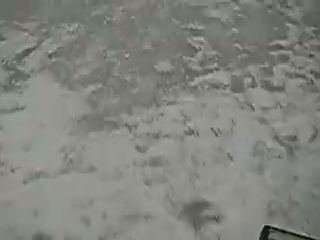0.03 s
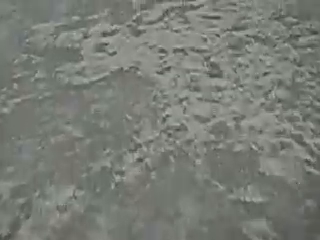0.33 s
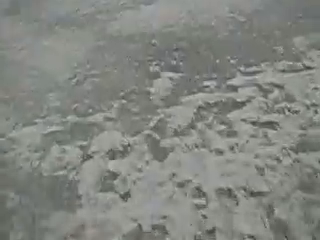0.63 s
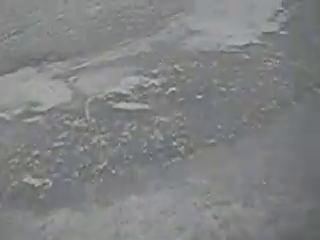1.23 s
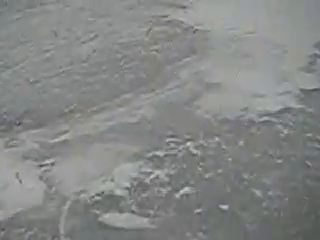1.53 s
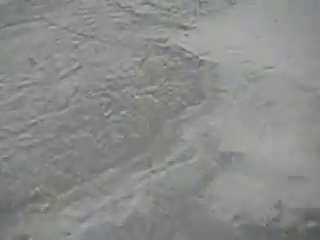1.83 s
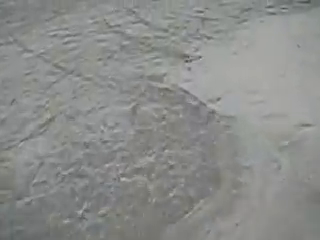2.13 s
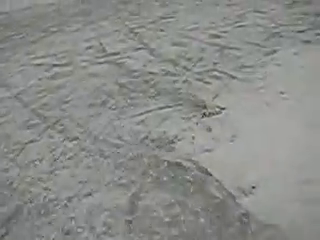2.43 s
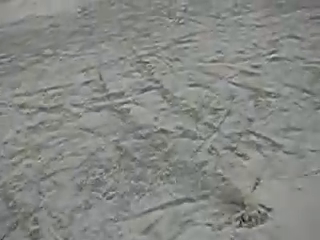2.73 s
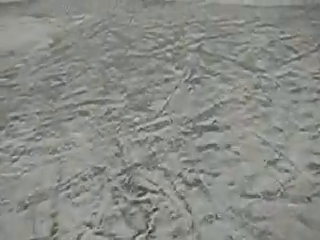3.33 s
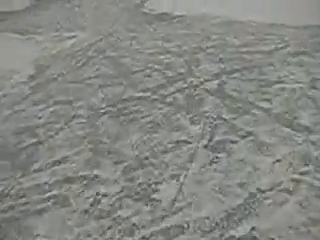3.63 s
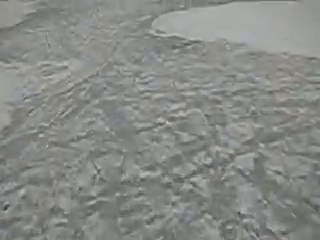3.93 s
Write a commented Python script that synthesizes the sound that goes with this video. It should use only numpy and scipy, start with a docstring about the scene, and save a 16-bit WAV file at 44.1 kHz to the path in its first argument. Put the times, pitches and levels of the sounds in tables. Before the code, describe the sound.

Dense crackling of bike tyres rolling on frozen ground, brittle crust snapping up close.

```python
"""Studded bicycle tyres on frozen ground, heard close up from a small camera on the bike.
From the start the studs bite in a dense crackle, air brushes the microphone, and brittle crust
snaps under the tread in a thick run of pops. About a second in, the rumble of tyres and frame comes up;
it is strongest between two and three seconds. More rough patches crumble by, and the snaps thin out
in the last half second. The narrow-band recorder clips the sharpest of them."""
import sys
import numpy as np
from scipy import signal
from scipy.fft import rfft, irfft
from scipy.io import wavfile
from scipy.ndimage import uniform_filter1d

SR = 44100
rng = np.random.default_rng(int(sys.argv[2]) if len(sys.argv) > 2 else 0)


def unload_wav(signal):
    """Save mono or channel-first audio to the path in sys.argv[1] as 16-bit WAV at rate SR, clipped to [-1, 1]."""
    wavfile.write(
        sys.argv[1],
        SR,
        np.round(np.clip(np.atleast_2d(signal).T, -1, 1) * 32767).astype(np.int16),
    )


N = 176400
BAND_HZ = 3980  # upper edge of the recorder's band


def undb(db):
    """Decibels to gain."""
    return 10 ** (np.asarray(db) / 20)


def unit(x):
    """Scale to rms 1."""
    return x / np.sqrt(np.mean(x ** 2))


def curve(table, column=1):
    """One column of a table, joined by straight lines in time."""
    rows = np.array(table)
    return np.interp(np.arange(N) / SR, rows[:, 0], rows[:, column])


def colour(x, points):
    """Filter by an outline of f/Hz, level/dB."""
    hz, db = np.array(points).T
    f = np.maximum(np.fft.rfftfreq(N, 1 / SR), 1)
    return irfft(rfft(x) * undb(np.interp(np.log(f), np.log(hz), db)), N)


def lowpass(x, hz, size=401):
    """Low-pass without delay, steeper with greater size."""
    return signal.fftconvolve(x, signal.firwin(size, hz, window="blackmanharris", fs=SR), "same")


def drift(rate_hz):
    """Smooth random drift with rms 1."""
    hold = max(int(SR / rate_hz), 2)
    steps = np.repeat(rng.standard_normal(N // hold + 1), hold)
    return unit(uniform_filter1d(steps, hold)[:N])


def add(out, start_s, sound):
    """Mix a sound in at a time."""
    i = int(round(start_s * SR))
    a, b = max(i, 0), min(i + len(sound), len(out))
    if b > a:
        out[a:b] += sound[a - i:b - i]


# Spectrum of the air right at the microphone: f/Hz, relative level/dB
BUFFET_COLOUR = [(5, 2), (25, 0), (55, -2), (90, -5.5), (150, -12), (400, -38.5)]


def air_buffet():
    """Moving air pushes softly on the microphone."""
    return unit(colour(rng.standard_normal(N), BUFFET_COLOUR)) * undb(-44.5)


# Rumble of the bike under the camera: t/s, relative level/dB
RUMBLE_LEVEL = [(0, -49), (.4, -51.5), (.9, -40.5), (1.45, -41.5), (1.7, -35.5), (1.95, -42), (2.3, -34),
                (2.9, -34), (3.6, -37.5), (4, -39)]
# Its spectrum: f/Hz, relative level/dB
RUMBLE_SPECTRUM = [(30, -18), (70, -6.5), (100, -0.5), (140, 0.5), (185, -1), (260, -4.5), (400, -17),
                   (800, -31.5)]


def frame_rumble():
    """The uneven ice shakes the tyres and the frame that carries the camera."""
    shaking = unit(colour(rng.standard_normal(N), RUMBLE_SPECTRUM))
    return shaking * undb(curve(RUMBLE_LEVEL) - 2)


# Steady rolling, close to the microphone: t/s, relative crunch level/dB, relative crackle level/dB
ROLLING_LEVEL = [(0, -31, -36), (.25, -27.5, -36), (.55, -28, -37), (.9, -29, -37), (1.15, -31.5, -37.5),
                 (1.4, -29.5, -36.5), (1.85, -29.5, -35.5), (2.15, -31, -37.5), (2.35, -30.5, -35),
                 (2.6, -30, -36), (2.92, -31, -42), (3.15, -29, -35), (3.5, -30.5, -36), (3.7, -31.5, -36),
                 (4, -32.5, -35.5)]
# Spectrum of the studs on ice: f/Hz, relative level/dB
STUD_SPECTRUM = [(100, -16.5), (220, -4.5), (320, 4), (400, 2.5), (480, 0.5), (650, 0.5), (1000, -2),
                 (1500, 0.5), (1900, -5), (2250, -2), (2600, -8), (3250, -7.5), (3450, -13.5), (3850, -12)]


def studs(patch_gain, bites_per_s=3400, spread_db=1.5, flicker_db=3, split_hz=1420):
    """Thousands of tiny bites a second, in quick flurries as the tread grips, surging on the patches."""
    strikes = rng.random(N) < bites_per_s / SR
    strength = undb(spread_db * np.minimum(rng.exponential(size=N), 4))
    polarity = np.where(rng.random(N) < .7, -1, 1)
    grip = undb(flicker_db * drift(rate_hz=219.6))
    bites = strikes * strength * polarity * grip
    bites = lowpass(colour(bites - bites.mean(), STUD_SPECTRUM), BAND_HZ)
    crunch = lowpass(bites, split_hz, size=101)
    crackle = bites - crunch
    # rolling and patches add in power
    crunch_gain = np.hypot(undb(curve(ROLLING_LEVEL) - 4), patch_gain)
    crackle_gain = np.hypot(undb(curve(ROLLING_LEVEL, column=2) + 2), patch_gain)
    return unit(crunch) * crunch_gain + unit(crackle) * crackle_gain


def fracture(hz, ring_cycles=.45, crack_hz=2500, crack_s=.0002):
    """A flake of ice lets go: a quick swell, a crack, a dying swing. Returns sound and time of peak."""
    lead_s = 3 * ring_cycles / hz
    t = np.arange(SR // 60) / SR - lead_s
    halving_s = ring_cycles / hz * np.where(t < 0, .85, 1)  # rises faster than it dies
    swing = .5 ** ((np.abs(t) / halving_s) ** 1.5) * np.cos(2 * np.pi * hz * t)
    crack = np.exp(-(t / crack_s) ** 2) * np.cos(2 * np.pi * crack_hz * t)
    return -.76 * swing - .24 * crack, lead_s


def chips(per_s=110, centre_hz=1640, octaves=1.1, spread_db=2):
    """Small flakes break at random, louder where the tread crunches harder."""
    out = np.zeros(N)
    for at, size, pitch in rng.random((int(per_s * N / SR), 3)):
        chip, _ = fracture(centre_hz * 2 ** (octaves * (2 * pitch - 1)))
        add(out, at * N / SR, chip * undb(spread_db * min(-np.log(size), 2.5)))
    return out * undb(curve(ROLLING_LEVEL) + 6.5)


# Patches of crust passing under the bike: t/s, length/s, relative level/dB, crumb f/Hz
CRUST_PATCHES = [(0, 0.013, -25.5, 2100), (0.037, 0.0088, -20, 1100), (.052, .008, -21, 1750),
                 (0.103, 0.018, -24.5, 1300), (0.137, .022, -23, 880), (0.282, 0.042, -28.5, 1004),
                 (0.34, 0.063, -29.5, 790), (0.407, 0.013, -21, 1200), (0.436, 0.034, -26, 980),
                 (0.513, 0.02, -28.5, 910), (0.578, 0.03, -30, 1780), (.66, 0.054, -28, 1700),
                 (0.724, 0.037, -27, 1400), (0.826, 0.027, -32, 870), (.92, 0.013, -22.5, 2220),
                 (1.019, 0.044, -30, 1170), (1.3, 0.05, -23.5, 1410), (1.351, 0.042, -30.5, 1600),
                 (1.429, .02, -40, 1900), (1.58, 0.022, -30.5, 900), (1.607, 0.028, -26.5, 1200),
                 (1.651, 0.021, -34, 1400), (1.716, 0.024, -28.5, 1670), (1.774, 0.023, -25.5, 1900),
                 (2.063, 0.025, -31, 1720), (2.375, 0.022, -20.5, 1014), (2.43, .045, -27, 1300),
                 (2.488, .035, -23, 1860), (2.66, 0.028, -30.5, 1210), (2.764, 0.034, -28.5, 1820),
                 (2.861, 0.0086, -23.5, 1530), (2.992, 0.053, -26, 1230), (3.071, 0.033, -24, 1400),
                 (3.207, 0.017, -20.5, 1310), (3.241, 0.036, -34.5, 1540), (3.357, 0.016, -31, 1230),
                 (3.401, 0.041, -30.5, 1660)]


def patch_bite(edge_s=.0027):
    """Extra gain of the studs, which bite harder while the tread crosses a patch."""
    t, gain = np.arange(N) / SR, np.zeros(N)
    for at, length, db, _ in CRUST_PATCHES:
        enter = np.clip((t - at) / edge_s + .5, 0, 1)
        leave = np.clip((at + length - t) / edge_s + .5, 0, 1)
        gain += undb(db - 5) * enter * leave
    return gain


def crumbs(per_s=550, spread_db=13, octaves=.78):
    """Each patch of crust collapses in a swarm of small fractures."""
    out = np.zeros(N)
    for at, length, db, hz in CRUST_PATCHES:
        draws = rng.random((100, 3))
        count = int(np.clip(length * per_s, 2, len(draws)))
        swarm = np.zeros(int(length * SR) + SR // 100)
        for k, (late, size, pitch) in enumerate(draws[:count]):
            crumb, _ = fracture(hz * 2 ** (octaves * (2 * pitch - 1)))
            add(swarm, (k + late) / count * length, crumb * undb(spread_db * size))
        patch_rms = np.linalg.norm(swarm) / np.sqrt(length * SR)
        add(out, at, swarm / patch_rms * undb(db - 4.5))
    return out


# Loud snaps in the foreground, big flakes sounding low: t/s, peak level/dB, f/Hz, ring/cycles
CRUST_SNAPS = [(0.0565, -0.4, 1070, 1.1), (0.0811, -6.0, 1010, 0.5), (0.0912, -6.1, 960, 0.5),
               (0.105, -9.5, 2290, 1.5), (0.1077, -12.6, 2170, 1.5), (0.1149, -4.3, 960, 0.4),
               (0.1204, -5.1, 910, 0.5), (0.1372, -8.6, 1130, 1.1), (0.1505, -4.5, 820, 0.4),
               (0.1536, -5.7, 770, 0.5), (0.2134, -7.1, 1070, 0.4), (0.2876, -4.9, 770, 0.65),
               (0.2926, -4.6, 690, 0.5), (0.2959, -15.8, 590, 1.5), (0.3108, -4.5, 860, 0.5),
               (0.4008, -6.3, 1190, 0.65), (0.4093, -11.1, 910, 1.5), (0.4328, -10.1, 1070, 0.5),
               (0.4411, -8.3, 910, 0.5), (0.4465, -4.7, 1260, 1.1), (0.4534, -1.8, 1010, 0.5),
               (0.4626, -6.0, 1070, 0.8), (0.4701, -6.8, 1010, 0.5), (0.4737, -8.4, 770, 0.5),
               (0.5227, -6.1, 690, 0.5), (0.5257, -8.8, 1070, 0.5), (0.5573, -12.4, 1330, 0.3),
               (0.5647, -6.8, 1480, 0.4), (0.5866, -10.6, 2050, 0.8), (0.5905, -4.3, 2170, 1.1),
               (0.5993, -9.7, 2290, 1.5), (0.6071, -11.4, 2170, 1.1), (0.6719, -8.6, 770, 0.4),
               (0.6804, -12.4, 1190, 0.4), (0.6962, -18.7, 620, 1.5), (0.7328, -11.2, 1190, 0.5),
               (0.7466, -2.3, 1130, 0.5), (0.7499, -4.2, 1650, 0.3), (0.7575, -12.5, 1400, 0.5),
               (0.8158, -13.2, 1260, 0.5), (0.8799, -12.5, 1260, 1.1), (0.8945, -11.9, 860, 0.4),
               (0.9229, -1.2, 1330, 0.65), (0.926, -6.1, 2170, 0.3), (0.9285, -9.3, 960, 0.4),
               (1.0237, -14.2, 770, 0.4), (1.038, -2.1, 1940, 0.4), (1.2005, -12.9, 1480, 0.4),
               (1.2104, -12.6, 1130, 0.3), (1.2231, -6.6, 1570, 0.4), (1.3046, -4.4, 1070, 0.5),
               (1.3093, -8.3, 1260, 1.5), (1.3163, -11.6, 1330, 1.5), (1.3193, -1.2, 960, 0.4),
               (1.3265, -9.5, 1650, 0.8), (1.331, -9.3, 1130, 0.8), (1.3448, -8.5, 1650, 0.5),
               (1.354, -14.1, 590, 0.5), (1.362, -10.1, 1130, 0.4), (1.3673, -16.4, 1480, 1.5),
               (1.4323, -11.1, 1840, 0.65), (1.438, -12.0, 1840, 0.5), (1.4426, -11.1, 1260, 0.8),
               (1.4465, -6.9, 1840, 0.5), (1.4745, -15.4, 1480, 0.8), (1.5053, -10.4, 1480, 0.4),
               (1.5404, -17.0, 1480, 1.5), (1.5721, -11.6, 1570, 0.3), (1.5773, -10.4, 1480, 0.5),
               (1.5913, -10.0, 500, 0.4), (1.6244, -9.9, 960, 0.3), (1.6531, -10.6, 1400, 0.3),
               (1.6597, -15.0, 1400, 1.1), (1.7022, -12.4, 1480, 0.3), (1.7211, -9.3, 1570, 0.65),
               (1.7315, -5.3, 1330, 0.4), (1.7776, -12.7, 820, 0.3), (1.7857, -1.1, 1330, 0.8),
               (1.8013, -5.6, 1480, 0.5), (1.8394, -13.4, 1330, 0.5), (1.8849, -14.0, 1570, 0.65),
               (1.9567, -10.5, 1740, 0.5), (1.9696, -7.3, 1570, 0.3), (2.0348, -12.4, 1260, 1.1),
               (2.0649, -12.2, 1130, 0.3), (2.0732, -7.2, 1570, 0.5), (2.1088, -10.4, 2170, 0.3),
               (2.1255, -11.1, 1330, 0.65), (2.1515, -16.4, 1570, 0.8), (2.1556, -13.2, 1650, 0.3),
               (2.2209, -12.8, 1840, 0.5), (2.2278, -11.1, 1400, 0.4), (2.2671, -6.7, 1740, 0.65),
               (2.2869, -12.3, 1260, 0.4), (2.2963, -8.6, 1330, 0.5), (2.3044, -15.0, 1400, 0.8),
               (2.3328, -15.6, 1480, 0.8), (2.3827, -6.7, 2050, 1.5), (2.3874, -1.1, 1010, 0.65),
               (2.4279, -10.5, 3000, 0.65), (2.4358, -7.6, 2170, 0.4), (2.5166, -5.3, 2050, 0.65),
               (2.5198, 0.5, 1740, 0.5), (2.5356, -12.0, 1740, 0.5), (2.564, -11.0, 1740, 0.65),
               (2.6098, -6.3, 1940, 0.3), (2.6652, -11.1, 1190, 0.4), (2.6686, -6.3, 1190, 0.4),
               (2.6751, -14.5, 1190, 0.65), (2.7305, -16.1, 1570, 1.5), (2.7762, -8.8, 2050, 1.1),
               (2.797, -8.3, 1650, 0.65), (2.8629, -6.0, 1400, 0.65), (2.9621, -13.0, 1400, 0.4),
               (2.9923, -5.6, 1130, 0.4), (3.0257, -0.6, 1260, 0.65), (3.0288, -14.9, 1330, 1.5),
               (3.0917, -4.6, 2290, 0.8), (3.1564, -11.4, 1740, 0.3), (3.1885, -11.9, 2420, 1.5),
               (3.1923, -5.8, 1330, 0.5), (3.2101, -6.9, 2170, 0.8), (3.2159, -9.4, 500, 0.4),
               (3.2191, -6.2, 1330, 0.3), (3.2251, -7.6, 1260, 0.8), (3.2393, -9.5, 1330, 0.65),
               (3.2617, -13.8, 2050, 1.1), (3.2832, -16.2, 1570, 1.1), (3.3057, -14.1, 1480, 0.8),
               (3.3299, -10.9, 1740, 0.3), (3.4092, -0.2, 1400, 0.65), (3.4125, -9.9, 1190, 0.4),
               (3.4369, -7.4, 1330, 0.3), (3.5584, -6.5, 1070, 0.3), (3.5994, -14.2, 1260, 0.65),
               (3.686, -12.8, 1570, 0.65), (3.7039, -14.4, 1480, 0.5), (3.7698, -12.5, 1400, 0.3),
               (3.9551, -9.1, 3000, 0.3), (3.9753, -9.6, 2170, 0.3), (3.9885, -14.2, 1570, 0.4)]


def snaps(thump_hz=315, thump_db=-22.5, splinter_db=-25, splinter_s=.0021):
    """Crust breaks under the tread; the tyre thumps and splinters scatter just after."""
    out, t = np.zeros(N), np.arange(SR // 25) / SR
    thump = np.sin(2 * np.pi * thump_hz * t) * np.exp(-t * thump_hz)
    for at, db, hz, ring_cycles in CRUST_SNAPS:
        snap, lead_s = fracture(hz, ring_cycles)
        hiss = unit(lowpass(rng.standard_normal(len(t)), min(2 * hz, BAND_HZ), size=41))
        splinters = hiss * np.exp(-t / splinter_s)
        add(out, at - lead_s, undb(db) * snap)
        add(out, at, undb(db + thump_db) * thump)
        add(out, at + 1 / hz, undb(db + splinter_db) * splinters)
    return out


def scene():
    """At the microphone, in mono: breaking ice over the studs' crackle and the rumble of bike and air."""
    return (snaps() + crumbs() + chips() + studs(patch_bite()) + frame_rumble() + air_buffet())[None]


def record(dry):
    """The camera keeps only a telephone-like band, adds a small DC offset and clips the peaks."""
    dc_offset, ceiling = -.05, .71
    clipped = np.clip(lowpass(dry[0], BAND_HZ) + dc_offset, -ceiling, ceiling)
    return lowpass(clipped, hz=16300)[None]


dry = scene()
out = record(dry)
unload_wav(out)
```